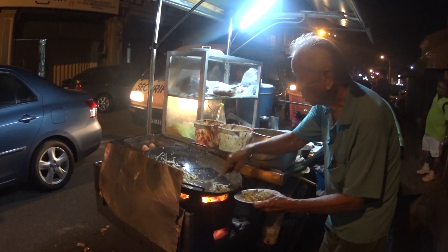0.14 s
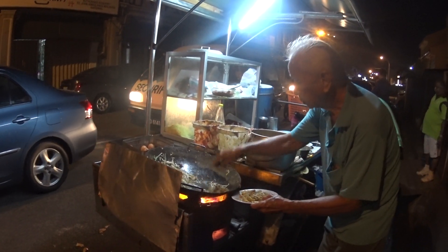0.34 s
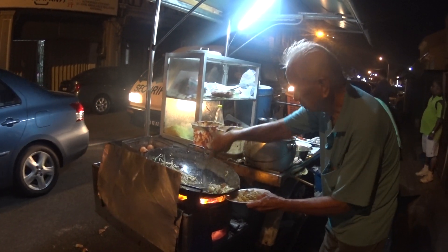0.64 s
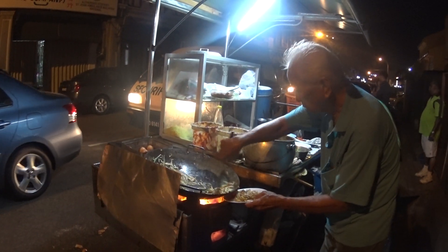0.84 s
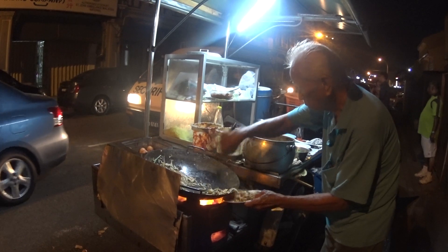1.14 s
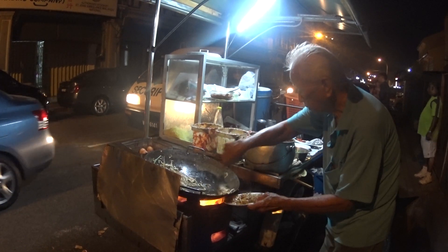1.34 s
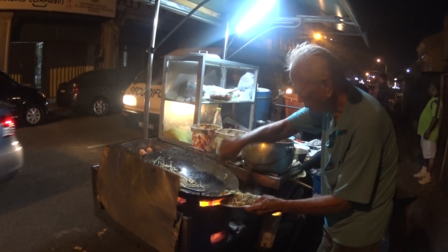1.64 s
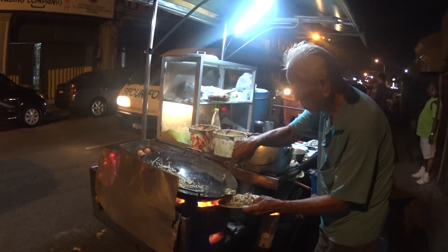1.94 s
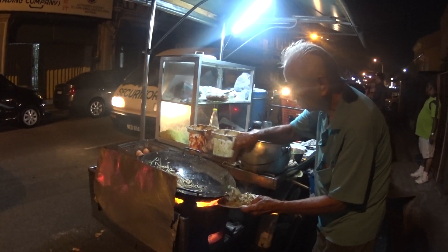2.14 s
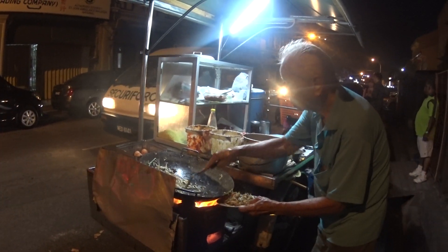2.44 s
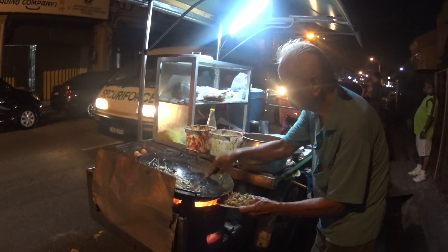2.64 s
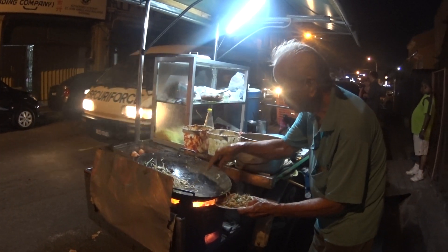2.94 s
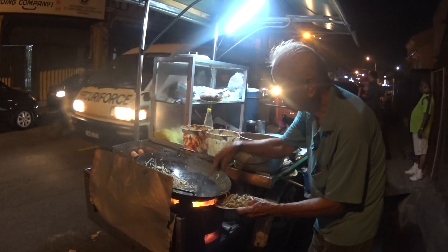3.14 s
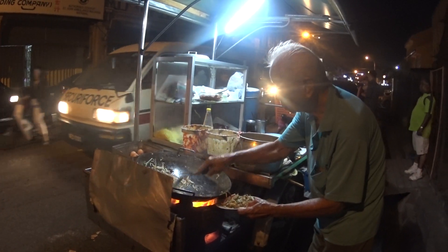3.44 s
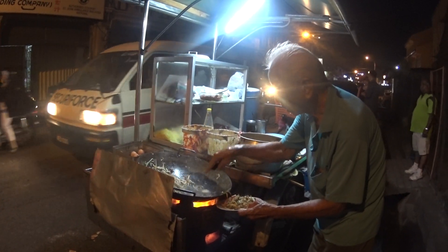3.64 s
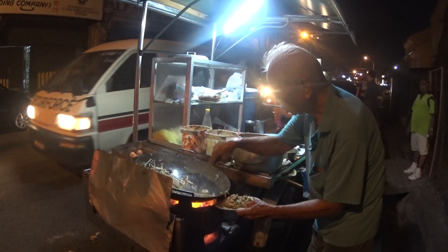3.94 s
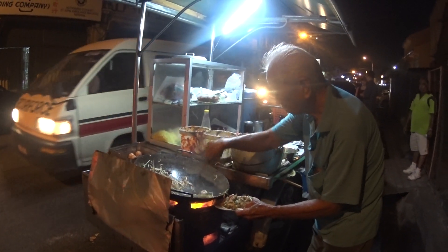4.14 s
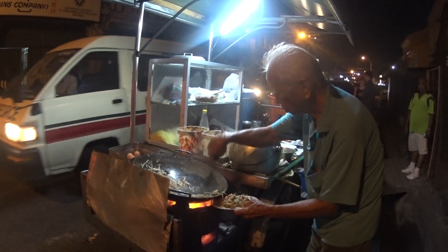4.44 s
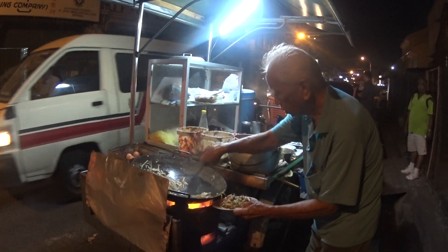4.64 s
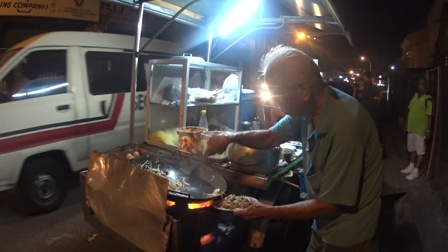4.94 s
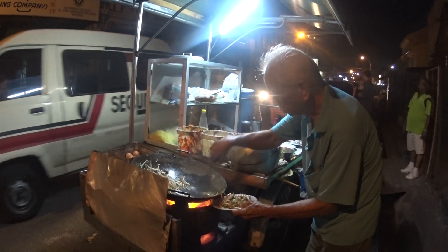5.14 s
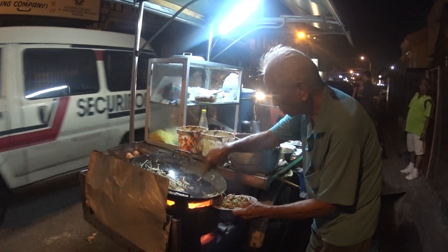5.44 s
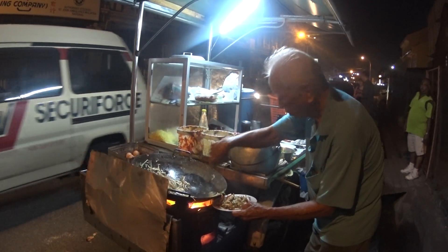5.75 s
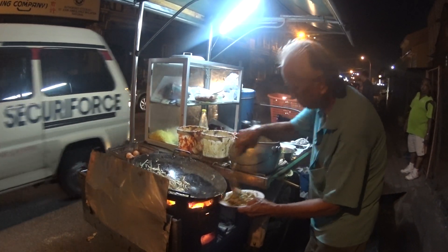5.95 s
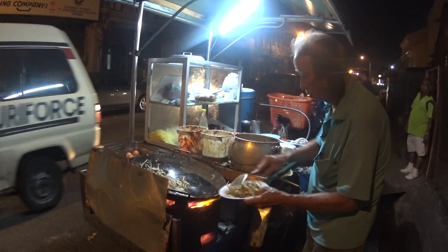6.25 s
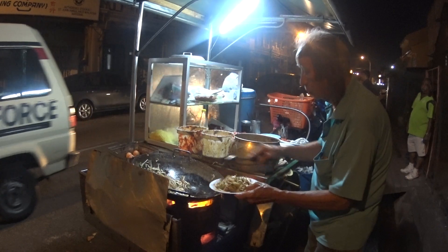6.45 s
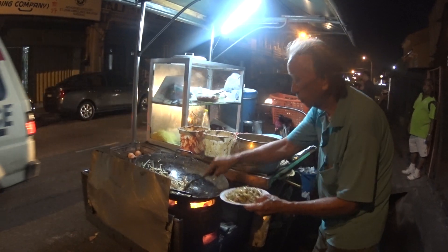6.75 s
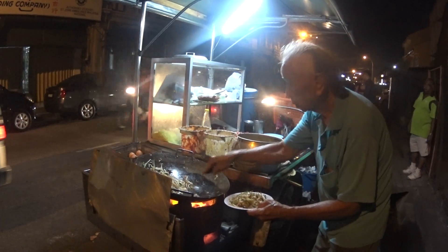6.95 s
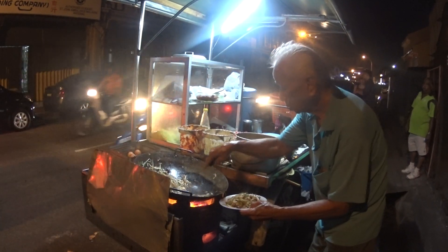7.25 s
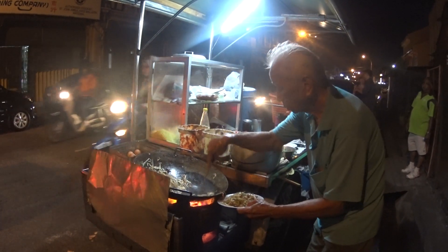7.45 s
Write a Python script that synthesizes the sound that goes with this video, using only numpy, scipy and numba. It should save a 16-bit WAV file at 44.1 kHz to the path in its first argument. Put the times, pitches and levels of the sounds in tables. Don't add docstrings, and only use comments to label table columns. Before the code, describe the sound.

Close by at an outdoor street stall, a steel spatula knocks, rattles and scrapes in an iron wok, each blow ringing briefly. Oil fizzes and spits steadily, flaring around three seconds. Behind, a van engine revs up, drones by and drops to a soft idle over low road rumble. The small stereo microphone squashes the loud clanks.

```python
import sys
import numpy as np
from scipy import signal
from scipy.fft import rfft, irfft, next_fast_len
from scipy.io import wavfile
from scipy.ndimage import uniform_filter1d
from numba import njit

SR = 44100
rng = np.random.default_rng(int(sys.argv[2]) if len(sys.argv) > 2 else 0)


def pcm_store(signal):
    levels = np.round(np.clip(np.atleast_2d(signal), -1, 1) * 32767)
    wavfile.write(sys.argv[1], SR, levels.astype(np.int16).T)


def level_to_linear(level):
    exponent = np.asarray(level, float) / 20
    return 10 ** exponent


N = 334719
T = np.arange(N) / SR

# start in seconds, level in dB, loudest ring in Hz,
# breadth of the ring around it in dB, bounce time in seconds.
BLOWS = [(0.1568, -14, 2670, -5, 0.033), (0.403, -13.5, 2495, -21, 0.026), (.758, -22.5, 2410, -13, 0.014),
         (1.2822, -15, 3200, -14, 0.017), (1.7513, -20, 2630, -24, 0.017), (2.307, -15, 3280, -17, .02),
         (2.609, -12.5, 2600, -20.5, 0.028), (3.1909, -15.5, 2550, -32, 0.031),
         (3.771, -19.5, 2700, -2, .038), (4.031, -18, 2490, -15, .031), (4.2279, -18, 3020, -21, 0.016),
         (4.493, -15, 3400, -8.5, 0.022), (4.748, -25, 2730, -18, .014), (5.1477, -21.5, 3330, -10, 0.02),
         (5.464, -15.5, 2835, -7, 0.029), (5.7005, -14.5, 2500, -25, 0.019),
         (6.1334, -19.5, 2180, -14, 0.0085), (6.8222, -23.5, 2580, -24, 0.021),
         (7.0663, -13.5, 2510, -19, 0.01), (7.3832, -11, 2790, -11.5, 0.028)]
# frequency in Hz, level in dB, ring time as a share of the blow's.
WOK_MODES = [(789, -2.5, 2.4), (916, -7, 1.1), (1234, -9, 1.8), (1315, 8, 0.67), (1422, 8.5, 1),
             (1637, 6, 2.5), (1700, 13, 3.6), (1950, -42, 3), (1853, -31, 0.82), (2100, -23, 0.74),
             (2188, 6, 2.1), (2500, -32, 1), (2410, -17, 0.67), (2495, -17, 2), (2750, 9, 1.5),
             (2778, 1.5, 0.5), (2860, -42, 0.38), (2835, -5.5, 0.15), (3150, 6, 3), (3280, 0.5, 2),
             (3200, -5, 0.33), (3582, 12, 0.37), (3910, 9.5, 0.59), (4450, 15, 0.52), (4880, 4.5, 0.58),
             (4610, 28.5, 0.12), (5530, 5.5, 0.46), (5940, 13.5, 0.6), (5620, 24.5, 0.21),
             (6400, 6.5, 0.09)]
# frequency in Hz, level in dB per Hz.
FRY_COLOUR = [(530, -42), (900, -16.5), (1080, -14), (1240, 2.5), (1580, 2), (2330, 3), (2850, -2),
              (3170, -1.5), (3680, -3.5), (4690, 5), (6250, 3), (7480, -5.5), (8860, -6), (9850, -0.5),
              (11300, -6), (14700, -43), (22000, -120)]


def level(x, db):
    return x * level_to_linear(db) / np.sqrt(np.mean(x ** 2))


def curve(rows, order):
    rows = np.array(rows)
    return np.interp(T, rows[:, 0], rows[:, order])


def shape(x, response):
    n = x.shape[-1]
    size = next_fast_len(n)
    hz = np.arange(size // 2 + 1) * SR / size + 1e-3
    return irfft(rfft(x, size) * response(hz), size)[..., :n]


def colour(rows):
    rows = np.array(rows)
    return lambda hz: level_to_linear(np.interp(np.log(hz), np.log(rows[:, 0]), rows[:, 1]))


def resonance(hz, centre_hz, width_hz):
    return 1j * hz * width_hz / (centre_hz ** 2 - hz ** 2 + 1j * hz * width_hz)


def walk(rate):
    k = int(SR / rate)
    held = np.repeat(rng.standard_normal(N // k + 1), k)
    return 1.384 * uniform_filter1d(uniform_filter1d(held, k), k)[:N]


def spread(make, share):
    return make() + share * np.array([make(), make()])


def place(out, s, sound):
    return np.pad(sound, (int(s * SR), N))[:len(out)]


def fading(t, t60):
    return np.exp(-np.log(1000) * t / t60)


@njit
def follow(x, attack, release):
    y, e = np.empty(len(x)), 0.
    for i in range(len(x)):
        e += (x[i] - e) * (attack if x[i] > e else release)
        y[i] = e
    return y


def wok_ring(t, spot_hz, low_db, high_db, bounce, bouncing):
    thicket = np.exp(np.linspace(np.log(1200), np.log(7500), 120) + 0.01 * rng.standard_normal(120))
    weak = np.array([thicket, np.full(120, 0.83), 1.23 * (2500 / thicket) ** 1.6])
    hz, mode_db, share = np.hstack([np.transpose(WOK_MODES), weak])
    luck, drift = rng.standard_normal((2, len(hz)))
    hz = hz * (1 + 0.02 * drift * np.clip(hz / 1500 - 1.2, 0, 3))

    mid_db = (low_db + high_db) / 2 + 6.0
    skirt_db = np.interp(hz, [2080, 2200, 3600, 4100], [low_db + 4.5, mid_db, mid_db, high_db + 0.5])
    spot_width_hz = 230 * level_to_linear(0.19 * (low_db + 15.5))
    offset_hz = hz - spot_hz
    spot = np.exp(-(offset_hz / spot_width_hz) ** 2) + 0.083 * np.exp(-(offset_hz / 800) ** 2)
    strong_treble = (hz > 4000) * (mode_db > 10)
    gain = (level_to_linear(skirt_db) + spot) * level_to_linear(mode_db + 3 * luck - 3.2 * strong_treble)

    t60 = (0.13 + 13.2 * bounce) * share * (1 + 0.5 * spot) * np.minimum(4000 / hz, 1)
    decay = fading(t, t60[:, None])
    ring = gain @ (decay * np.sin(2 * np.pi * hz[:, None] * t + 2 * drift[:, None]))
    ring /= decay.mean(axis=0) ** (0.5 * bouncing)
    return ring / np.sqrt(np.sum(gain ** 2))


def knocks():
    t, out = T[:SR // 3], np.zeros(N)
    for s, db, spot_hz, low_db, bounce in BLOWS:
        dull_db = 125 * bounce
        high_db = 2.36 + 0.61 * low_db - dull_db
        bouncing = 1 / (1 + np.exp(np.minimum((t - bounce) / 0.0042, 50)))
        ring = wok_ring(t, spot_hz, low_db, high_db, bounce, bouncing)
        rattle = 1 + 2 * bouncing * uniform_filter1d(rng.standard_normal(len(t)), size=60)
        rattle += (1.7 - rattle) * np.exp(-t / 0.002)

        grit = shape(rng.standard_normal(len(t)) ** 3 / 2, lambda hz: resonance(hz, 3600, 3600))
        rasp = grit * (np.exp(-t / 0.0027) + 0.5 * bouncing)
        blow = (1 + 8.4 * bouncing) * rattle * ring + level_to_linear(high_db + 20) * rasp

        crack = shape(rng.standard_normal(len(t)), lambda hz: resonance(hz, 8000, 9000))
        crack *= np.exp(-t / 0.0028) * level_to_linear(0.4 * high_db + 17 - dull_db + 4)
        seating = 1 - np.exp(-t / 0.0006)
        out += place(out, s, (blow + crack) * seating * level_to_linear(db - 10))
    return out


def scrapes():
    # start in seconds, length in seconds, ring level in dB, ring pitch in Hz, steam
    # level in dB.
    drags = [(.853, 0.11, -38, 1700, -34.5), (.999, 0.072, -35, 3150, -34), (1.332, 0.13, -37, 3280, -45),
             (1.425, .071, -33, 1700, -38.5), (1.525, 0.04, -34.5, 1700, -61),
             (2.84, .049, -33.5, 2330, -24.5), (3.39, 0.1, -33.5, 2320, -59),
             (3.523, .054, -29.5, 2200, -20), (3.784, 0.028, -18, 3130, -25), (4.038, .01, -9, 2550, -16),
             (4.777, 0.033, -30, 2200, -29), (5.179, 0.047, -32, 3250, -27.5),
             (5.209, 0.012, -32, 4400, -33), (5.472, .022, -14, 2660, -24),
             (6.143, 0.0087, -30, 4600, -22.5), (6.003, 0.11, -35, 1934, -54),
             (6.222, .046, -31.5, 1700, -49)]
    slides = [(s + bounce, 0.06, db - 22, hz, db - 19.5) for s, db, hz, _, bounce in BLOWS]
    t, out = T[:SR // 3], np.zeros(N)
    for s, length, ring_db, spot_hz, steam_db in drags + slides:
        touch = np.clip(t / 0.0081, 0, 1) * np.exp(-np.maximum(t - length, 0) / 0.0089)
        ticks = rng.standard_normal((2, len(t))) ** 3 / 4

        def iron(hz):
            return sum(resonance(hz, f, 43) * np.exp(-np.abs(f - spot_hz) / 260) for f, _, _ in WOK_MODES)

        def steam(hz):
            return colour(FRY_COLOUR)(hz) * resonance(hz, 5000, 12000)

        ring = level(shape(ticks[0], iron), ring_db)
        puff = level(shape(np.tanh(ticks[1]), steam), steam_db)
        out += place(out, s, touch * (ring + puff))
    return out


def yard(x, t60, wet_db):
    t = T[:SR // 2]
    tail = rng.standard_normal((2, len(t))) * fading(t, t60) * (t > 0.002)
    tail /= np.sqrt(np.sum(tail ** 2, axis=1, keepdims=True))
    return x + level_to_linear(wet_db) * signal.fftconvolve(x[None], tail, axes=1)[:, :N]


def fizz():
    pops = (rng.random(N) < 4000 / SR) * rng.uniform(-1, 1, size=N)
    return shape(level(pops, 0.4) + rng.standard_normal(N), colour(FRY_COLOUR))


def frying():
    # time in seconds, level in dB.
    heat = [(0, -31.5), (.51, -30), (.97, -33.5), (2.0, -34.5), (2.65, -34), (2.88, -28.5), (3.2, -24),
            (3.45, -31.5), (3.65, -26), (4.02, -29.5), (4.63, -28.5), (4.85, -31.5), (5.4, -31.5),
            (5.96, -34.5), (6.76, -31.5), (7.27, -28.5), (7.59, -32.5)]
    heat_db = curve(heat, order=1)
    oil = spread(fizz, share=0.56)
    treble = shape(oil, lambda hz: 1 / (1 + (3900 / hz) ** 10))
    body = oil - treble
    iron = shape(body, lambda hz: sum(resonance(hz, f, 30) * level_to_linear(db) for f, db, _ in WOK_MODES[2:23]))
    body = level(body, 0) + level(iron, -17.5)

    drops = (rng.random(N) < 60 / SR) * level_to_linear(3.7 * np.minimum(rng.exponential(size=N), 4.5))
    spit = shape(drops, lambda hz: resonance(hz, 10500, 7000) * resonance(hz, 7800, 9000))
    top = level(treble, 0) + level(spit, -14)

    simmer_db = -30 + 0.29 * (heat_db - heat_db.mean()) + 3 * van_near()
    top_gain = level_to_linear(heat_db + 1.27 * walk(18) + 1)
    body_gain = level_to_linear(simmer_db + 0.82 * walk(14) + 0.37 * walk(3.34) - 2.5)
    return top * top_gain + level(body, 0) * body_gain


def van_near():
    return np.exp(-((T - 6.0) / 1.87) ** 2)


def engine(rate_hz, gain, pipe, lump_db):
    turns = np.cumsum(rate_hz * (1 + 0.004 * walk(9))) / SR
    count = turns.astype(int)
    firing_db = rng.standard_normal(400)[count] + lump_db * (count % 2)
    pulses = np.diff(count, prepend=0) * level_to_linear(firing_db)
    gas = shape(pulses, lambda hz: sum(np.abs(resonance(hz, f, w)) ** 2 * level_to_linear(db) for f, w, db in pipe))
    return level(gas, 0) * gain * level_to_linear(0.89 * walk(3.95))


def engines():
    # time in seconds, firing rate in Hz, level in dB.
    passing = [
        (1.1, 29.63, -47),
        (1.7, 34.12, -39.5),
        (2.5, 36.22, -39),
        (4.2, 35.9, -37),
        (4.95, 28.46, -42),
        (5.69, 29.79, -48),
        (6.8, 29.34, -43.5),
        (7.1, 28.6, -66),
        (7.59, 28.4, -48),
    ]
    # frequency in Hz, width in Hz, level in dB.
    exhaust = [(66.5, 11, -24), (122, 23, 6.5), (250, 81, -2)]
    # start in seconds, end in seconds, level in
    # dB.
    idlers = [
        (-.2, 1.2, -41),
        (4.947, 7.7, -41.5),
    ]
    # frequency in Hz, width in Hz, level in dB.
    idler_pipe = [(60, 25, 0.5), (118, 56, 5), (146, 18, 2)]
    fade_s, idle_hz = 0.33, 29.05
    present = np.zeros(N)
    for start, end, db in idlers:
        present += level_to_linear(db) * np.clip(np.minimum(T - start, end - T) / fade_s + 0.5, 0, 1)
    van_gain = level_to_linear(curve(passing, order=2)) * (T > passing[0][0])
    van = engine(curve(passing, order=1), van_gain, exhaust, lump_db=-2.0)
    return van + engine(idle_hz, present, idler_pipe, lump_db=-3.5)


def street():
    # frequency in Hz, level in dB per Hz.
    road = [(15, -44), (25, -11), (49, -11.5), (128, 0), (700, -14), (996, -13.5), (1080, -16),
            (1150, -21.5), (1500, -43), (2530, -120)]
    # start in seconds, peak in dB, pitch in Hz, ring time in seconds.
    bumps = [
        (2.881, -27, 86, 0.12),
        (4.949, -30, 108, 0.14),
        (5.259, -31, 94.2, 0.12),
        (7.039, -28, 46, 0.079),
    ]
    rumble = spread(lambda: shape(rng.standard_normal(N), colour(road)), share=0.23)
    rumble = level(rumble, -36.5) * level_to_linear(0.156 * T)
    shake = shape(rng.standard_normal(N), lambda hz: resonance(hz, 59, 38) ** 2)
    shake = level(shake, -45.5) * np.maximum.accumulate(van_near())
    out, t = np.zeros(N), T[:SR // 2]
    for s, db, hz, t60 in bumps:
        thump = np.sin(2 * np.pi * hz * t) * fading(t, t60) * (1 - np.exp(-t / 0.0015))
        out += place(out, s, 2 * level_to_linear(db) * thump)
    return rumble + shake + out


def scene():
    wok = yard(knocks() + scrapes(), t60=0.28, wet_db=-8.5)
    return wok + frying() + engines() + street()


def low_pass(x):
    return signal.sosfilt(signal.butter(12, 12340, fs=SR, output="sos"), x)


def record(dry):
    # frequency in Hz, lead of the left port in radians.
    port_lead = [(0, 0.11), (340, 1.15), (780, 1.64), (1810, 1.11), (2240, 1.6), (3270, 0.52), (3700, 1.24),
                 (4310, 0), (7410, 0.61), (8270, 0.98), (8870, 0), (9220, 0.057), (10900, 0.18),
                 (11900, 0.0)]
    # frequency in Hz, left minus right in dB.
    port_tilt = [(60, -1), (110, -0.5), (190, -0.5), (350, -0.5), (630, 0.0), (1130, 0), (2020, 1.5),
                 (3630, 2), (6530, 0.5), (11700, 1)]
    lead_hz, lead_rad = np.transpose(port_lead)
    tilt = colour([(hz, db / 2) for hz, db in port_tilt])
    side = np.array([[1], [-1]])

    def ports(hz):
        half_lead = np.interp(hz, lead_hz, lead_rad) / 2
        return (tilt(hz) * np.exp(1j * half_lead)) ** side / np.maximum(np.cos(half_lead), 0.5)

    x = shape(dry, ports)
    ahead = np.roll(np.abs(x).max(axis=0), -130)
    peak = follow(ahead, 0.08, 0.002)
    x = x * np.minimum(1, (0.24 / (peak + 1e-9)) ** 0.62)
    x = 0.75 * np.tanh(x / 0.75)
    x = signal.sosfilt(signal.ellip(14, 0.5, 90, 11080, fs=SR, output="sos"), x)
    return low_pass(x)


dry = scene()
out = record(dry)
pcm_store(out)
```